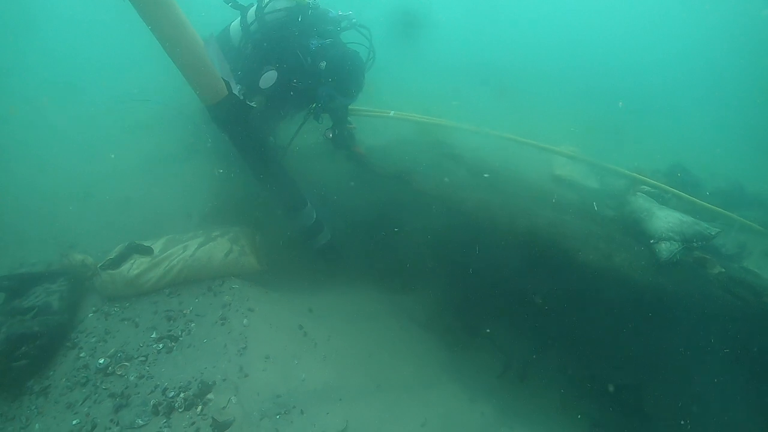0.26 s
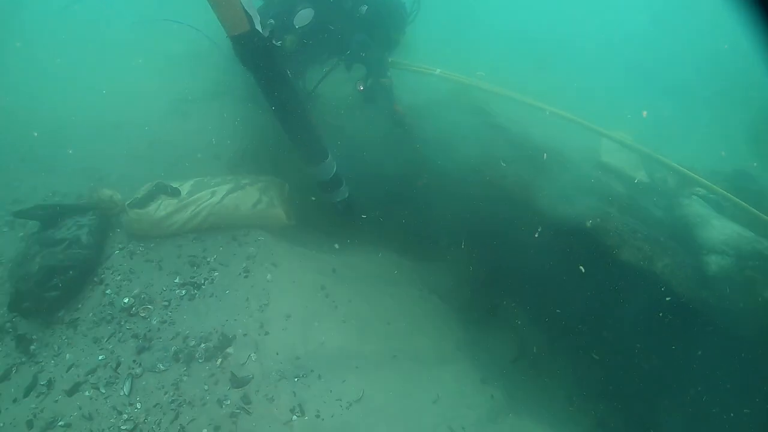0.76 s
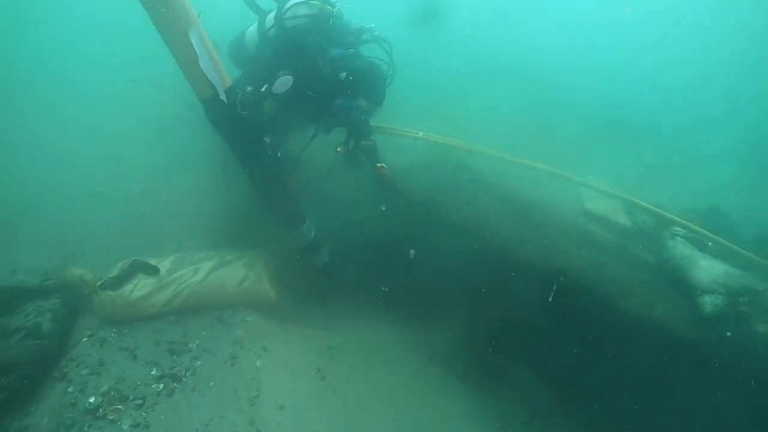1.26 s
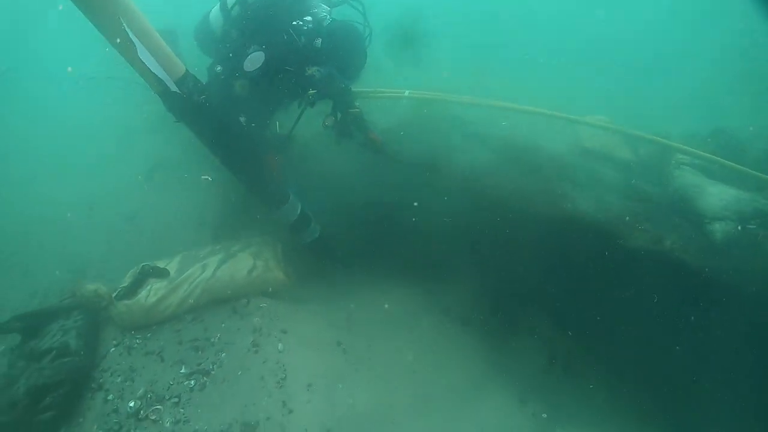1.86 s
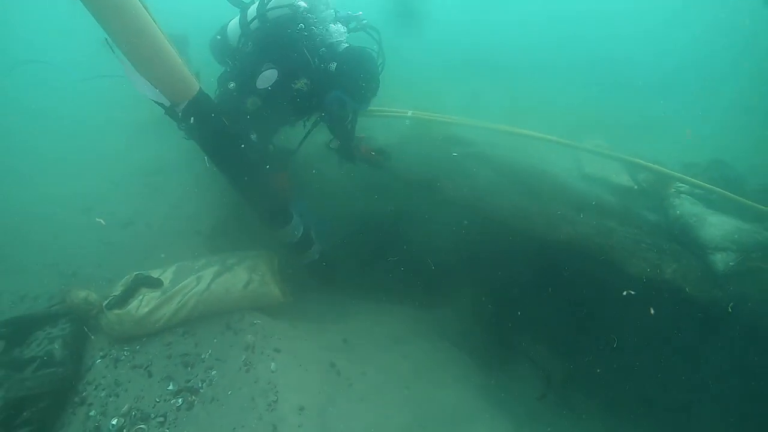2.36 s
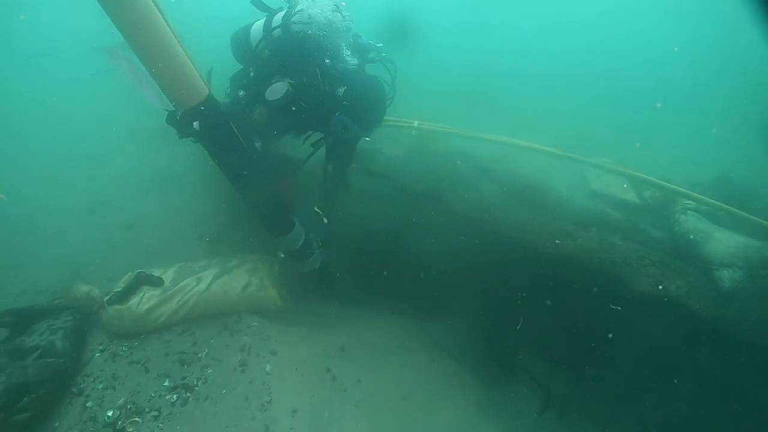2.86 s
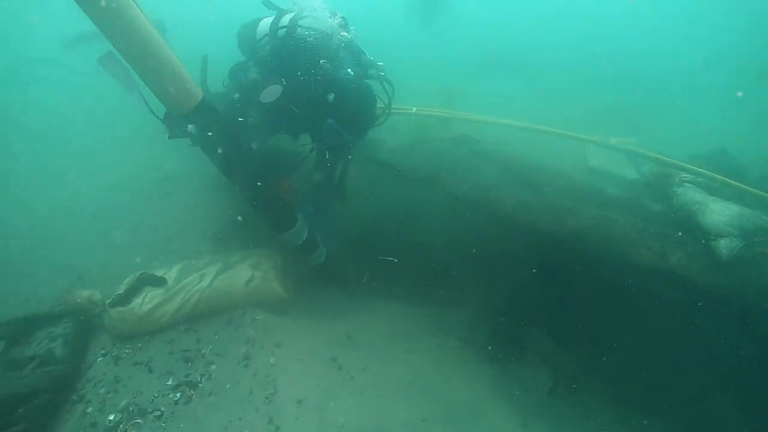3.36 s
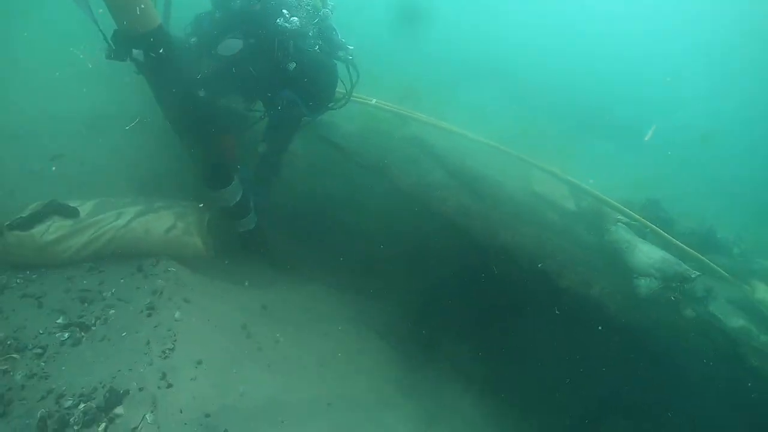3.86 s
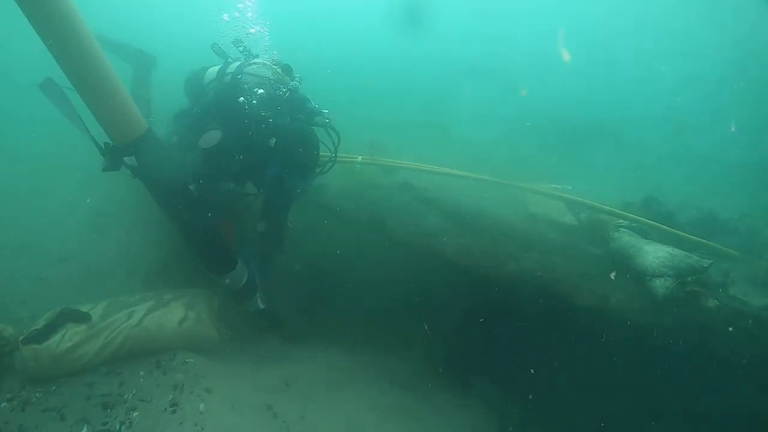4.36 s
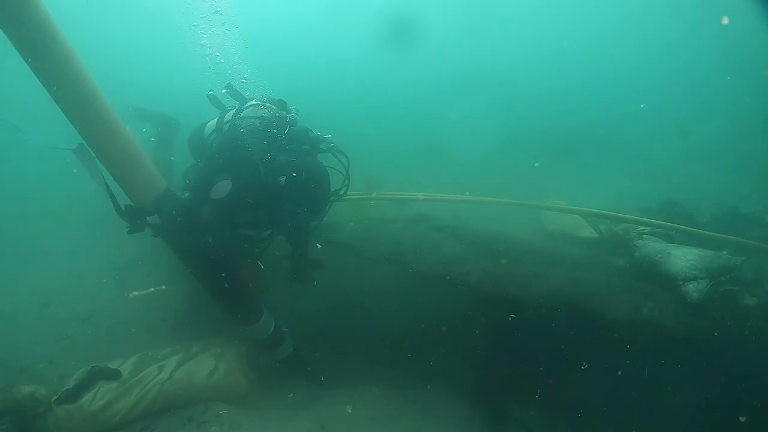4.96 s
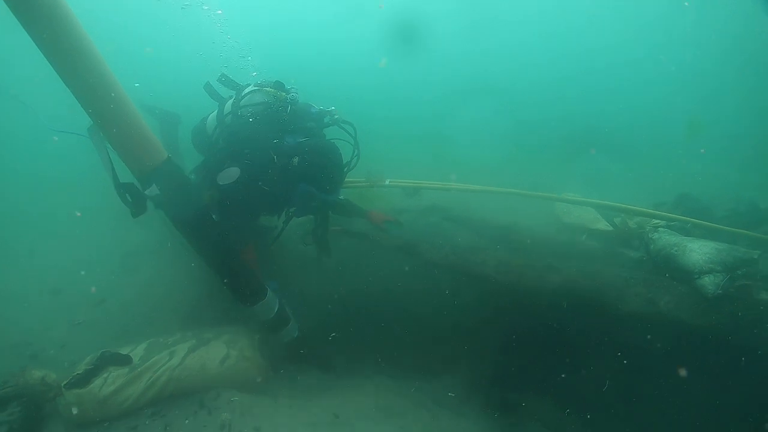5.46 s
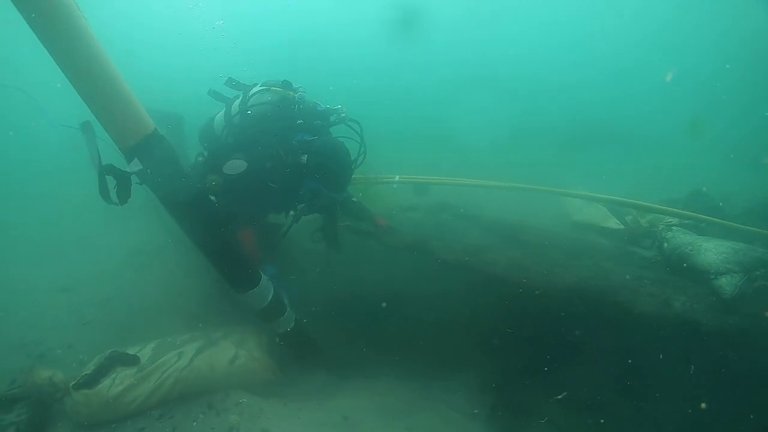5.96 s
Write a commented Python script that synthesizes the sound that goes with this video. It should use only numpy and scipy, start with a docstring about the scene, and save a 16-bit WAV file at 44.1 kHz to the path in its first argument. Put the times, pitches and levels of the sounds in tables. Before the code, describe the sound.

Underwater stereo sound from inside a camera housing: a steady, uneven bubbling rush in a suction pipe, midrange and boxy, with faint gritty hiss. Deep surges rumble beneath, leaning left. Small bumps grow into heavy booming thuds and slaps on the right, then cease after about four and a half seconds, leaving burbling, churning water, a fuller rush and scattered crisp stone clicks.

```python
"""On the seabed, close beside the pipe of an airlift dredge: two microphones in an underwater camera housing.
Popping bubbles gurgle and rush up the pipe through the housing resonances; noise and grit hiss as sand;
stones click as short bursts of noise. Outside, filtered noise and pops make water that surges, churns and burbles.
Gulps of air boom and slap on the housing's right side; the hardest make the limiter duck everything."""
import sys
import numpy as np
from scipy import signal
from scipy.fft import rfft, irfft, next_fast_len
from scipy.io import wavfile
from scipy.ndimage import uniform_filter1d, minimum_filter1d

SR = 44100
rng = np.random.default_rng(int(sys.argv[2]) if len(sys.argv) > 2 else 0)


def int16_out(signal):
    """Quantize to a 16-bit WAV file."""
    q = np.round(np.clip(np.atleast_2d(signal).T, -1, 1) * 32767)
    wavfile.write(sys.argv[1], SR, q.astype(np.int16))


N = 273861
TIME = np.arange(N) / SR
FFT_SIZE = next_fast_len(N, True)
HZ = np.fft.rfftfreq(FFT_SIZE, 1 / SR)


def amp(db):
    """Decibels to gain."""
    return 10 ** (np.asarray(db) / 20)


def unit(x):
    """Scales a sound to rms 1."""
    return x / np.sqrt(np.mean(x ** 2) + 1e-20)


def unit_pair(pair):
    """Scales two channels so that their mean has rms 1."""
    return pair / np.std(pair.mean(0))


def curves(table):
    """The columns of a table after its times, interpolated sample by sample."""
    s, *columns = np.transpose(table)
    return [np.interp(TIME, s, column) for column in columns]


def colour(points):
    """Gain at every frequency from a short spectrum, straight in dB over log frequency."""
    hz, db = np.transpose(points)
    return amp(np.interp(np.log(HZ + 1), np.log(hz), db, left=-90, right=-90))


def filtered(x, gain):
    """Passes x through a frequency response."""
    return irfft(rfft(x, FFT_SIZE) * gain, FFT_SIZE)[..., :N]


def resonance(hz, width):
    """The gain of a steep resonance, with a further fall-off above it."""
    peak = 1 / (1 + (2 * (HZ - hz) / width) ** 2)
    return peak / np.sqrt(1 + (HZ / (2 * hz)) ** 4)


def noise():
    """White noise."""
    return rng.standard_normal(N)


def waver(rate_hz):
    """Slow random wandering of rms 1, up to the given rate."""
    low_pass = 1 / (1 + (HZ / rate_hz) ** 4)
    no_drift = HZ / (HZ + 3)
    return unit(filtered(noise(), low_pass * no_drift))


def pops(per_s, spread_db):
    """A random train of impulses of rms 1: many small, a few large."""
    size = amp(spread_db * np.minimum(rng.exponential(1, N), 4))
    sign = rng.choice([-1, 1], N)
    return unit(size * sign * (rng.random(N) < per_s / SR))


def pan(balance_db):
    """Left and right gains of mean 1 for a level difference, left minus right."""
    gains = amp(np.array([balance_db, -balance_db]) / 2).reshape(2, -1)
    return gains / gains.mean(0)


def pair(make, alike):
    """Two partly alike channels of a random sound."""
    alike, left = np.clip(alike, 0, 1), make()
    right = alike * left + np.sqrt(1 - alike ** 2) * make()
    return np.array([left, right])


def add(mix, s, sound):
    """Adds a sound to the mix at time s."""
    part = mix[..., max(round(s * SR), 0):][..., :sound.shape[-1]]
    part += sound[..., :part.shape[-1]]


def swells(rows, rise_db_per_s, fall_db_per_s):
    """Gain over time of events that rise, hold and die away; their powers add."""
    power = np.zeros(N)
    for s, db, length in rows:
        early = np.maximum(s - length / 2 - TIME, 0)
        late = np.maximum(TIME - s - length / 2, 0)
        below_db = rise_db_per_s * early + fall_db_per_s * late
        heard = below_db < 60
        power[heard] += amp(db - below_db[heard]) ** 2
    return np.sqrt(power)


def bubbles(low_hz, high_hz, per_s, cycles, slope_db, rise=0.059):
    """A swarm of bubbles of 18 sizes; each rings for some cycles and rises a little in pitch."""
    t, swarm = np.arange(SR // 10) / SR, np.zeros(N)
    for hz in np.geomspace(low_hz, high_hz, num=18):
        age = hz * t / cycles
        ring = np.sin(2 * np.pi * hz * t * (1 + rise * age))
        bubble = unit(age * np.exp(-4 * age) * ring)
        level = amp(slope_db * np.log2(hz / low_hz))  # slope in dB per octave
        swarm += level * signal.oaconvolve(pops(per_s, spread_db=2.5), bubble)[:N]
    return unit(swarm)


# Resonances of the housing at its two microphones, levels relative within a band:
# f/Hz, width/Hz, left level/dB, right level/dB, phase by which left leads/rad
HOUSING_MODES = [(520, 320, -31.5, -44.5, 1.5), (785.3, 159, -6.5, -6, .5), (895, 70, -7, -3, 2),
                 (989, 190, -9, -9, 2.5), (1178, 88, -2, -2, -2), (1294, 284, -7.5, -18.5, -0.27),
                 (1496, 189, -1, -6, 3), (1658, 272, -2.5, 1, 2.0), (1808, 182, -2.5, 2, 1.76),
                 (1896, 234, -4, -5.5, -0.4), (2180, 860, -16.5, -18, 1.61), (2549, 360, -19.5, -12.5, 4.5),
                 (2694, 230, -13, -13.5, 2.5), (3200, 257, -15.5, -15, 1.5), (3656, 340, -27, -23.5, 0.5),
                 (4530, 730, -36, -26.5, 1.12), (5210, 540, -53, -27, 0.5), (5760, 1230, -25, -33, 3.5),
                 (6330, 850, -30, -26, -0.9), (7820, 1000, -35.5, -37, 1.5), (9630, 1770, -42.5, -43, -0.4),
                 (11500, 2200, -54, -51, 1.5)]


def housing(drive, low_hz, high_hz):
    """Sound through the resonances in a range; each reaches the two microphones with its own strength and phase."""
    power, cross = np.zeros((2, len(HZ))), 0j
    for hz, width, left_db, right_db, lead in HOUSING_MODES:
        if low_hz < hz < high_hz:
            ports = amp([[left_db], [right_db]]) * resonance(hz, width)
            power += ports ** 2
            cross = cross + ports[0] * ports[1] * np.exp(1j * lead)
    left_only = np.array([[1], [0]])  # the whole phase lead goes to the left
    return filtered(drive, np.sqrt(power) * np.exp(1j * np.angle(cross) * left_only))


# Flow in the pipe, levels before their random wavering:
# t/s, low gurgle level/dB, middle rush level/dB, sand hiss level/dB
PIPE_FLOW = [(0, -30.5, -26.5, -44.5), (.5, -29.5, -26.5, -43), (.9, -29.5, -27, -47.5),
             (1.6, -29.5, -26.5, -46.5), (2.3, -33, -27.5, -51), (3.05, -33, -27.5, -51.5),
             (3.35, -40, -31, -51), (3.75, -34.5, -27.5, -49), (4.2, -37, -28.5, -54.5),
             (4.3, -35.5, -30, -54.5), (4.8, -35, -28, -53.5), (5.7, -29.5, -23.5, -50),
             (6.21, -28.5, -25.5, -47)]
# the resonances that each part of the flow rings: lowest f/Hz, highest f/Hz
GURGLE_BAND, RUSH_BAND, FIZZ_BAND, SAND_BAND = (0, 1100), (1100, 3000), (3000, 4000), (4000, 16000)


def airflow():
    """Bubbles pop and ring in uneven slugs; one swarm rings the low, middle and high bands, each at its own level."""
    gurgle_db, rush_db, sand_db = curves(PIPE_FLOW)
    slugs = waver(rate_hz=72)
    gurgle_level = amp(gurgle_db + 0.55 * slugs + 1.1 * waver(rate_hz=48))
    rush_level = amp(rush_db + 1.0 * slugs + 0.53 * waver(rate_hz=140))
    # sand tears the air into fizz, so the fizz follows both rush and sand
    fizz_level = amp((rush_db + sand_db) / 2 - 8.0 + 0.56 * slugs + 2.4 * waver(rate_hz=24))
    ringing = bubbles(720, 3800, per_s=22, cycles=24, slope_db=0)
    popping = pair(lambda: pops(per_s=8000, spread_db=2.0), alike=0.99)
    swarm = popping + amp(-13.0) * ringing
    gurgle, rush, fizz = (unit_pair(housing(swarm, *band)) for band in (GURGLE_BAND, RUSH_BAND, FIZZ_BAND))
    return gurgle_level * gurgle + rush_level * rush + fizz_level * fizz


def sand():
    """Grains hiss along the pipe wall, with coarser grit among them; the more sand, the brighter the hiss."""
    _, _, sand_db = curves(PIPE_FLOW)
    grit = pair(lambda: pops(per_s=90, spread_db=3.5), alike=.8)
    grains = pair(noise, alike=0.68)
    hiss = unit_pair(housing(grains + amp(-6.5) * grit, *SAND_BAND))
    top = filtered(hiss, 1 / (1 + (9000 / (HZ + 1)) ** 8))  # the hiss above 9 kHz
    brightness = amp(0.38 * (sand_db - sand_db.mean()) - .5)
    level = amp(sand_db + 1.0 * waver(rate_hz=14.4))
    return level * (hiss + (brightness - 1) * top)


# Spectrum of the deep throb: f/Hz, relative level/dB
THROB_SPECTRUM = [(8, -24), (20, -10), (34, -18), (41, -20), (46, 0), (52, -10.5), (62, -20.5), (100, -28)]
# Surges of water against the housing: t/s at the crest, level/dB, length of the crest/s
WATER_SURGES = [(.06, -20.5, 0.033), (.2, -23, 0.027), (.35, -21.5, .03), (.78, -19.5, 0.21),
                (1.05, -21.5, 0.033), (1.27, -22.5, 0.13), (1.46, -27, .04), (1.82, -20.5, 0.17),
                (2.57, -17.5, .04), (2.68, -29, 0.031), (2.88, -20, 0.028), (3.24, -25, 0.12),
                (3.77, -23, .1), (4.02, -18, 0.1), (4.22, -27.5, 0.17), (4.51, -25, 0.021),
                (5.27, -20, 0.042), (5.61, -27.5, 0.066), (6.02, -16, 0.036)]
SURGE_RISE_DB_PER_S, SURGE_FALL_DB_PER_S, STILL_WATER_DB = 186, 131, -34.5


def surge():
    """Water heaves against the housing in a deep, even throb that swells with every surge."""
    heave = filtered(pair(noise, alike=0.92), colour(THROB_SPECTRUM))
    heave /= np.sqrt(uniform_filter1d(heave.mean(0) ** 2, size=6000) + 1e-12)  # evens out the throb
    surges = swells(WATER_SURGES, SURGE_RISE_DB_PER_S, SURGE_FALL_DB_PER_S)
    strength = np.hypot(amp(STILL_WATER_DB), surges)
    return strength * pan(balance_db=-6.5) * heave


# Spectrum of churning water: f/Hz, relative level/dB
EDDY_SPECTRUM = [(45, -30), (64, -7.5), (80, 5.5), (105, -2.5), (132, 2.5), (175, -11), (240, -10),
                 (330, -29), (480, -25), (700, -40)]


def eddies():
    """Lumpy, low churning of water from coloured pops, rms 1."""
    lumps = pair(lambda: pops(per_s=700, spread_db=2.6), alike=0.67)
    return unit_pair(filtered(lumps, colour(EDDY_SPECTRUM)))


# Water that churns close beside the housing: t/s, level/dB, left minus right level/dB
WATER_CHURN = [(0, -29, -11), (.5, -35, -8), (.76, -26, -10), (1.02, -35.5, -9), (2.0, -36, -8),
               (3.15, -30, -12), (4.25, -32, -13), (4.7, -44.5, -6), (5.38, -33, 1), (5.53, -22.5, -4),
               (5.65, -34, 0), (6.21, -30, -9)]
# the churning that each gulp leaves behind: level for a 0 dB thud, rise, fall, and dB per dB of thud
WAKE_DB, WAKE_RISE_DB_PER_S, WAKE_FALL_DB_PER_S, WAKE_FOLLOWS = -19.5, 902, 168, 0.51


def churn():
    """Water churns beside the housing, and harder on the right in the wake of each gulp."""
    level_db, balance_db = curves(WATER_CHURN)
    wakes = [(s + length / 2, WAKE_DB + WAKE_FOLLOWS * thud_db, length) for s, thud_db, length in AIR_GULPS]
    wake = swells(wakes, WAKE_RISE_DB_PER_S, WAKE_FALL_DB_PER_S) * pan(balance_db=-13.5)
    steady = amp(level_db) * pan(balance_db)
    return np.hypot(steady, wake) * eddies()


# Spells of burbling: t/s at the crest, level/dB of the blips, length of the crest/s
BURBLE_SPELLS = [(2.85, -31.5, 0.28), (5.45, -34.5, 0.17)]
SPELL_RISE_DB_PER_S, SPELL_FALL_DB_PER_S, QUIET_BURBLE_DB = 19.5, 26, -52.5


def burble(stir_db=2):
    """Spells of large, short-lived bubbles stir the water ahead; the housing rings along at its low wall resonance."""
    spells = swells(BURBLE_SPELLS, SPELL_RISE_DB_PER_S, SPELL_FALL_DB_PER_S)
    strength = np.hypot(amp(QUIET_BURBLE_DB), spells)
    swarm = bubbles(123.3, 620, per_s=7, cycles=6.65, slope_db=-5.0, rise=.12)
    blips = unit(filtered(swarm, 1 + amp(0.5) * resonance(hz=465, width=76)))
    return strength * pan(balance_db=-0.5) * (blips + amp(stir_db) * eddies())


# Gulps of air: t/s, relative thud level/dB, length of the tumbling after it/s
AIR_GULPS = [(.032, -18, .04), (0.456, -18, 0.026), (0.612, -24.5, 0.022), (0.744, -28.5, 0.041),
             (1.207, -14.5, 0.13), (1.458, -16.5, 0.089), (1.716, -9.5, 0.0096), (1.751, -6.5, 0.0076),
             (2.178, -8.5, .012), (2.694, -12, 0.043), (2.888, -5, 0.0091), (3.008, -13, 0.036),
             (3.112, -12, 0.009), (3.142, 7, .005), (3.467, -1, 0.017), (3.581, -21, .03),
             (3.905, -11.5, .02), (3.922, -9.5, 0.015), (3.972, -6.5, 0.034), (4.072, -3, 0.014),
             (4.218, -9.5, .005), (4.228, 6.5, 0.007), (4.486, -24, 0.025)]
# Boom of the whole housing when it is bumped: f/Hz, width/Hz, relative level/dB
HOUSING_BOOM = [(47.3, 19.5, -13.5), (119, 43, -7), (231, 62.6, -0.5), (286, 156, -8), (404, 120, -13),
                (485.4, 41, -15.5)]


def gulps(tumble_db=-7, tumbles_per_s=190, shove_s=0.00047, shove_growth=0.38):
    """Each gulp shoves the housing, the bigger the slower and duller, then breaks into bubbles that tumble along it."""
    shoves, t = np.zeros(N), np.arange(SR // 4) / SR
    for s, thud_db, length in AIR_GULPS:
        spread_s = shove_s * amp(shove_growth * thud_db)
        shove = signal.windows.gaussian(SR // 200, SR * spread_s)
        shove, start = amp(thud_db) * shove / shove.sum(), s - len(shove) / 2 / SR
        times = np.cumsum(rng.uniform(.3, 1.7, 60)) / tumbles_per_s
        signs = rng.choice([-1, 1], len(times))
        add(shoves, start, shove)
        for delay, sign in zip(times[times < length], signs):
            add(shoves, start + delay, sign * amp(tumble_db) * shove)
    boom = np.zeros(len(t))
    for hz, width, db in HOUSING_BOOM:
        decay = np.pi * width * t
        swell = decay * np.exp(1 - decay)  # peaks at 1
        boom -= amp(db) * swell * np.sin(2 * np.pi * hz * t)
    right_side = pan(balance_db=-13)
    return amp(-3.5) * right_side * signal.oaconvolve(shoves, boom)[:N]


# Slaps on the housing wall: t/s, peak level/dB before panning, centre f/Hz
WALL_SLAPS = [(1.717, -20, 460), (2.885, -11.5, 1360), (3.111, -18, 760), (3.139, -9, 1030),
              (3.203, -12.5, 820), (3.469, -16, 1320), (3.923, -30, 910), (4.068, -16, 1200),
              (4.222, -8, 1300)]


def slaps(swell_s=0.0015):
    """The wall is slapped, mostly along with a bump: a few milliseconds of noise, an octave wide, on the right."""
    out, t = np.zeros((2, N)), np.arange(SR // 25) / SR
    for s, db, hz in WALL_SLAPS:
        octave = [hz / np.sqrt(2), hz * np.sqrt(2)]
        band = signal.butter(4, octave, "band", fs=SR, output="sos")
        burst = signal.sosfilt(band, rng.standard_normal(len(t)) * t * np.exp(-t / swell_s))
        add(out, s, amp(db) * pan(balance_db=-16) * burst / abs(burst).max())
    return out


# Stones that click in the pipe:
# t/s, relative level/dB, left minus right level/dB, low body against crack level/dB
PIPE_STONES = [(2.647, -30, -2, 17.5), (2.9922, -31, 4, 1), (3.1417, -28, -10, 12), (3.5785, -28.5, 9, -1),
               (3.74, -29, 1, 9.5), (3.8646, -34, 3, 0), (4.4625, -23.5, 5.5, -1), (4.7359, -31.5, -2, 2),
               (4.8627, -29, -4.5, -1), (5.015, -17.5, -4, -1), (5.295, -31, -2, 5), (5.3868, -28, -1, 6),
               (5.5004, -22, 3, 1), (5.67, -24.5, 3, -2), (5.7671, -20.5, 3.5, 0), (5.7892, -22, 1, -1),
               (5.906, -29, 3, 14), (6.022, -21.5, 7, 1), (6.0611, -33.5, 0, 17)]
# Spectrum of a click: f/Hz, relative level/dB
CLICK_SPECTRUM = [(1000, -17), (3000, -3.5), (4500, -9.5), (6100, 2), (7500, -10.5), (10000, -24),
                  (14000, -34), (16000, -51)]


def stones(ring_s=0.00052, tail_s=0.0063, tail_db=-24, body_hz=3700):
    """A stone hits the pipe: a sharp crack with a brief, faint tail; heavy stones also sound lower down."""
    t, cracks, bodies = np.arange(SR // 30) / SR, np.zeros((2, N)), np.zeros((2, N))
    decay = np.exp(-t / ring_s) + amp(tail_db) * np.exp(-t / tail_s)
    for s, db, balance_db, body_db in PIPE_STONES:
        crack = pan(balance_db) * rng.standard_normal((2, len(t))) * decay
        add(cracks, s, amp(db) * crack)
        add(bodies, s, amp(db + body_db) * crack)
    low, spectrum = 1 / (1 + (HZ / body_hz) ** 8), colour(CLICK_SPECTRUM)
    return amp(16.5) * (filtered(cracks, (1 - low) * spectrum) + filtered(bodies, low * spectrum))


def scene():
    """Everything that reaches the two microphones."""
    return airflow() + sand() + surge() + churn() + burble() + gulps() + slaps() + stones()


CUTOFF_HZ = 15700


def record(dry, ceiling_db=-3.0, hold_s=0.023, recovery_s=0.043):
    """A limiter ducks at once under hard bumps, holds a moment and recovers; then the band limit."""
    peak_db = 20 * np.log10(abs(dry).max(0) + 1e-9)
    over_db = np.maximum(peak_db - ceiling_db, 1e-9)
    hold = max(round(hold_s * SR), 1)
    over_db = -minimum_filter1d(-over_db, hold, origin=(hold - 1) // 2)
    # the gain reduction, in dB, dies away exponentially
    recovery = TIME / recovery_s
    held_db = np.exp(np.maximum.accumulate(np.log(over_db) + recovery) - recovery)
    gain_db = uniform_filter1d(minimum_filter1d(-held_db, size=120), size=120)
    limited = dry * amp(gain_db)
    low_pass = signal.firwin(511, CUTOFF_HZ, window=("kaiser", 9), fs=SR)
    return signal.oaconvolve(limited, low_pass[None], "same")


dry = scene()
out = record(dry)
int16_out(out)
```